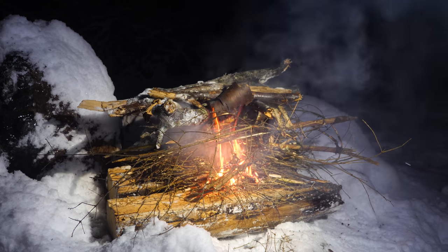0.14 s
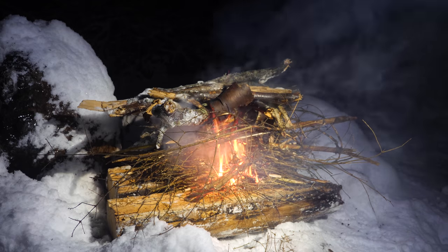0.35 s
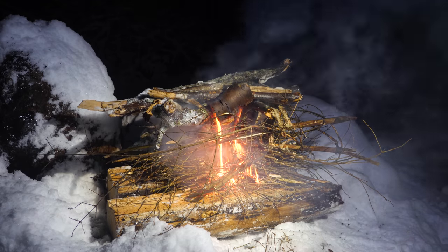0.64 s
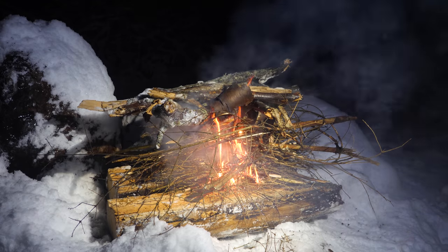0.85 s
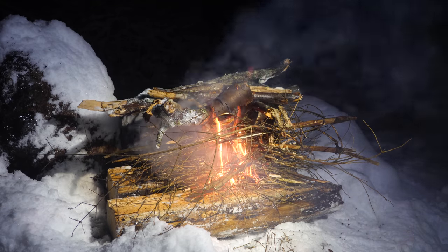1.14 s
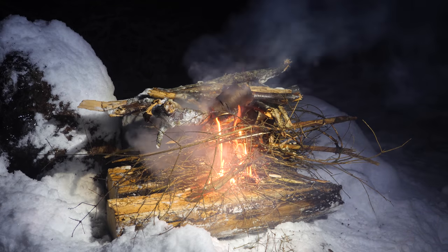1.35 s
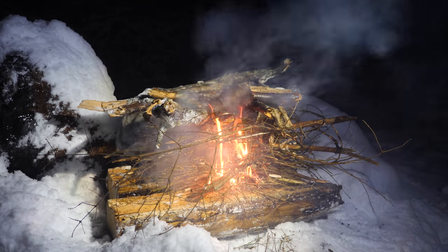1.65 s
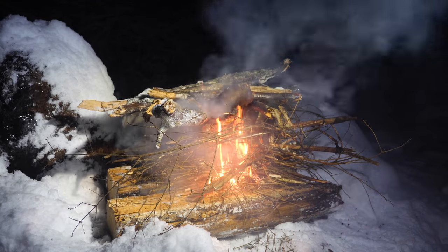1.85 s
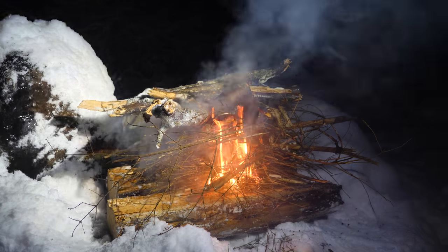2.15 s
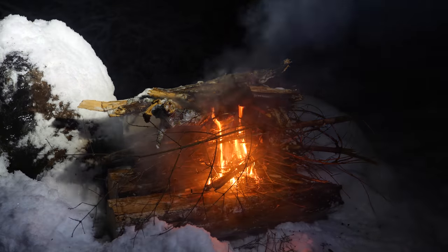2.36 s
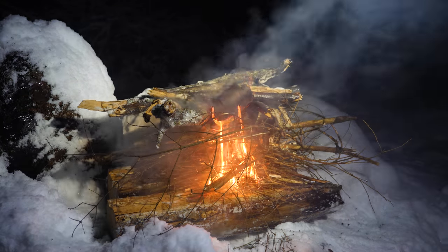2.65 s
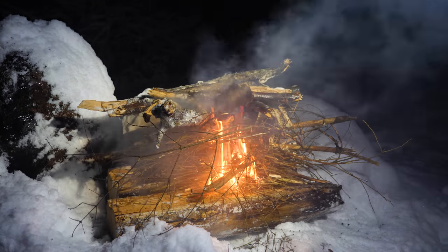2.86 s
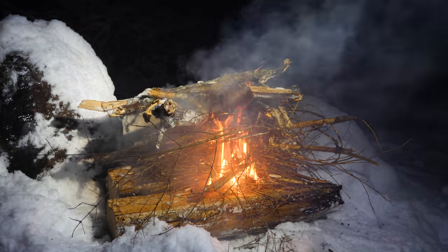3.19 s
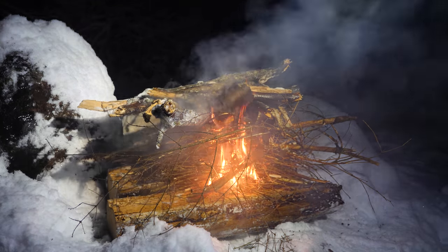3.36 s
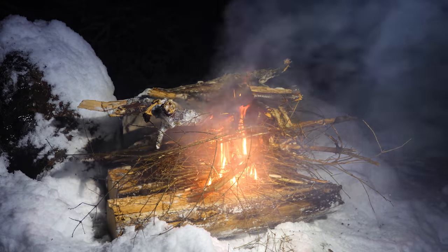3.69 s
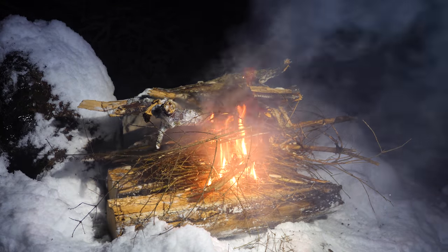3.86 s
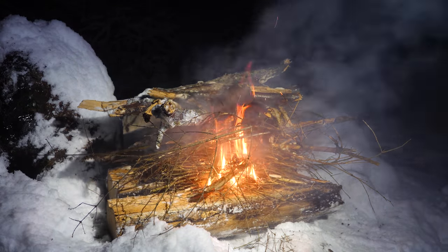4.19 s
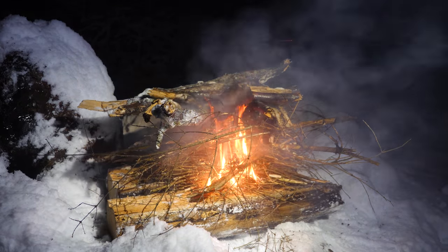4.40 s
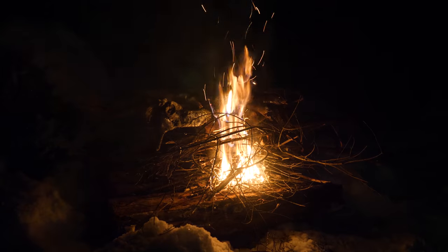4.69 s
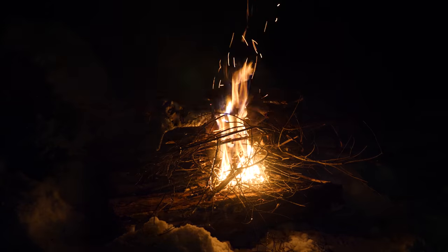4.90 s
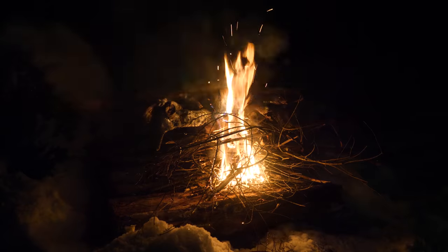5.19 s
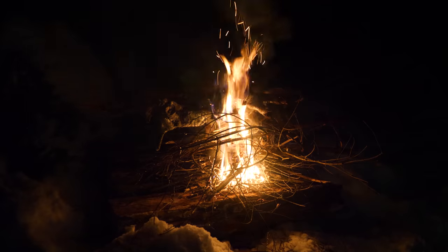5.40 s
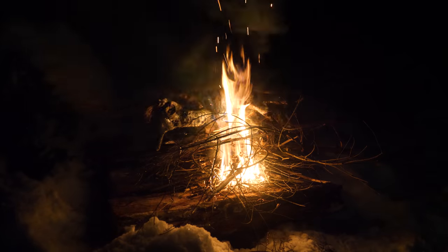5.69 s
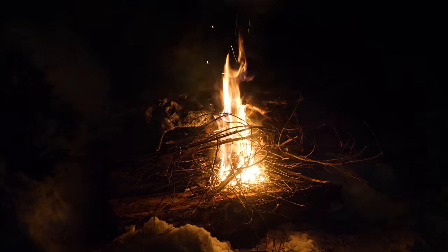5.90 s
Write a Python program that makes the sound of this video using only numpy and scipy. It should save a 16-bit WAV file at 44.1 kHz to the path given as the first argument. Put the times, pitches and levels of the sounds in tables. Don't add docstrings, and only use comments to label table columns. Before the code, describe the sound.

Twigs and wet logs crackle and fizz, scattered snaps building to hard, loud pops and a soft low fire flutter, heard close outdoors.

```python
import sys
import numpy as np
from scipy import signal
from scipy.fft import rfft, irfft
from scipy.io import wavfile
from scipy.ndimage import uniform_filter1d, minimum_filter1d, map_coordinates

SR = 44100
rng = np.random.default_rng(int(sys.argv[2]) if len(sys.argv) > 2 else 0)


def materialize(psi):
    bounded = np.clip(np.atleast_2d(psi).T, -1, 1)
    quanta = np.round(bounded * 32767).astype(np.int16)
    wavfile.write(sys.argv[1], SR, quanta)


def attenuation_scalar(level_db):
    decades = np.asarray(level_db, float) / 20
    return 10 ** decades


N = 266364
LIFE = 1024


def unit(x):
    return x / np.sqrt(np.mean(x ** 2) + 1e-20)


def along(points, hz):
    f, v = np.transpose(points)
    return np.interp(np.log(hz + 1), np.log(f + 1), v)


def wobble(rate):
    knots = rng.standard_normal(int(N * rate / SR) + 4)
    return map_coordinates(knots, [np.arange(N) * rate / SR])


def rush(spectrum, patchy_db):
    hz, _, z = signal.stft(rng.standard_normal(N), SR, nperseg=1024)
    field = uniform_filter1d(rng.standard_normal(z.shape), 8, 0)
    field = uniform_filter1d(field, 5, 1)
    gain = attenuation_scalar(along(spectrum, hz)[:, None] + patchy_db * unit(field))
    return unit(signal.istft(z * gain, SR, nperseg=1024)[1][:N])


def flames(flame_db):
    # f/Hz, level/dB per Hz
    flame_tone = [(18, -12), (65, 3), (120, -1.5), (220, -8.5), (400, -8.5), (600, -22.5), (1200, -120)]
    flutter_db = 0.34 + 0.045 * np.clip(flame_db + 68.0, 0, 9)
    return attenuation_scalar(flame_db + flutter_db * wobble(14)) * rush(flame_tone, patchy_db=0.8)


def roar(roar_db, flare):
    # f/Hz, level/dB per Hz
    roar_tone = [(150, -9), (250, -14.5), (496, -6.5), (775, -1), (1100, -8), (1400, -14), (1820, -13.5),
                 (3080, -120)]
    return attenuation_scalar(roar_db + 0.37 * flare) * rush(roar_tone, patchy_db=1.1)


def steam(steam_db, flare):
    # f/Hz, level/dB per Hz
    steam_tone = [(900, -35), (1250, 12), (3350, 10), (5000, -2), (5900, -7), (7000, -46), (9000, -120)]
    return attenuation_scalar(steam_db - 2.0 + 1.4 * flare) * rush(steam_tone, patchy_db=-1.5)


def steam_pressure(clock):
    # t/s, level/dB
    jets = [(0, -62), (.3, -67.5), (.95, -67.5), (1.45, -60), (1.7, -66.5), (2, -62), (2.38, -63),
            (2.65, -60.5), (3.05, -62.5), (3.4, -63), (4.3, -63), (5.1, -65), (5.32, -59.5), (6.04, -60.5)]
    # t/s, level/dB
    vents = [
        (3.946, -46.5),
        (4.574, -48),
        (4.8, -48.5),
    ]
    fall = 134
    power = attenuation_scalar(2 * np.interp(clock, *np.transpose(jets)))
    for s, db in vents:
        power = power + (clock > s) * attenuation_scalar(2 * (db - fall * np.abs(clock - s)))
    return 10 * np.log10(power)


def fizz(fizz_db, fibres):
    # f/Hz, level/dB per Hz
    fizz_tone = [(5000, -2), (5800, -9), (7100, -8), (10700, -9.5), (15000, -12.5), (15700, -36),
                 (15950, -120)]
    jolt = np.diff(fibres, prepend=0) ** 2
    wide_swell = np.sqrt(np.abs(uniform_filter1d(jolt, 700)))
    close_swell = np.sqrt(np.abs(uniform_filter1d(jolt, 220)))
    seep = attenuation_scalar(fizz_db + 1.1 + 3.3 * wobble(40) + 1.2 * wobble(160))
    return (seep + 0.13 * wide_swell + 0.14 * close_swell) * rush(fizz_tone, patchy_db=2.8)


def causal(db):
    fold = np.r_[1, np.full(LIFE // 2 - 1, 2.), 1, np.zeros(LIFE // 2 - 1)]
    return np.exp(rfft(irfft(np.log(attenuation_scalar(db)), LIFE) * fold))


def bursts(s, peak_db, hollow_hz, thud_db, snap_db, echo_db, t60):
    # f/Hz, level/dB
    burst_tone = [(120, -25), (320, -3), (900, 0.5), (2400, 1), (4800, -4), (6500, -8), (10500, -15.5),
                  (15200, -16), (16300, -41), (16800, -92)]
    count = len(s)
    t, hz = np.arange(LIFE) / SR, np.fft.rfftfreq(LIFE, 1 / SR)

    late = t > .0002
    scatter = attenuation_scalar(echo_db - 60 * t / t60)
    snow_tail = attenuation_scalar(echo_db - 23.5 - 60 * t / 0.15)
    echoes = rfft(late * (scatter + snow_tail) * rng.standard_normal((count, LIFE)))
    hollow = causal(6.9 / (1 + ((hz - hollow_hz[:, None]) / 450) ** 2) - 0.64 * hz / 10000)
    thin = hz ** 2 / (hz ** 2 + 1900 ** 2)

    low = 1 / (1 + (hz / 1200) ** 4)
    high = 1 / (1 + (6000 / (hz + 1)) ** 8)
    glint_db = 7 * rng.standard_normal((count, 1))
    glint_hz = rng.uniform(5660, 13600, (count, 1))
    glint = glint_db / (1 + ((hz - glint_hz) / 1500) ** 2)
    balance = np.outer(thud_db + 11.5, low) + np.outer(snap_db + 10.5, high)
    colour = causal(along(burst_tone, hz) + glint + balance)

    swing = np.clip(.45 - 0.014 * thud_db, .1, .92)[:, None]
    rebound = swing * np.exp(-2j * np.pi * hz * 0.00015)
    spectrum = (echoes * hollow * thin + rebound - 1) * colour
    crest = np.abs(irfft(spectrum * (hz > 1200), LIFE)).max(1)
    wave = irfft(spectrum, LIFE) * (attenuation_scalar(peak_db) / crest)[:, None]
    at = np.round(s * SR).astype(int)[:, None] + np.arange(LIFE)
    return np.bincount(at.ravel(), wave.ravel(), N + LIFE)[:N]


def ticks(s, peak_db, snap_db, echo_db):
    draw = rng.standard_normal((len(s), 2))
    hollow_hz = 3000 * np.exp(0.56 * draw[:, 0])
    thud_db = -16 + 3.0 * draw[:, 1]
    return bursts(s, peak_db, hollow_hz, thud_db, snap_db, echo_db, t60=0.0092)


def crackle(fizz_db, count=650):
    s, size, snap = rng.random((count, 3)).T
    s = s * (N - 1) / SR
    at = (s * SR).astype(int)
    peak_db = .5 * fizz_db[at] - 15 + 5 * size ** 2 + 3.8 * wobble(18)[at]
    return ticks(s, peak_db, -12 + 16 * snap, echo_db=-11.5)


def splits():
    # t/s, level/dB (peak)
    damp = [(.0274, -29), (.1019, -27.5), (.3086, -31), (0.9455, -30), (1.0774, -26), (1.3385, -26),
            (1.8212, -27), (2.0647, -27), (2.075, -31), (2.5595, -29.5), (2.8597, -28), (2.87, -31),
            (3.329, -26), (3.4839, -27), (3.8912, -26), (4.0378, -31), (4.045, -31), (4.3169, -26),
            (4.659, -31), (4.903, -24), (4.931, -29), (5.3133, -26.5), (5.415, -29), (5.4352, -26.5),
            (5.492, -24.5), (5.5985, -29), (5.6875, -23), (5.7418, -29), (5.871, -27), (5.894, -33)]
    # t/s, level/dB (peak)
    seasoned = [(.109, -28), (.24, -32.5), (0.3556, -21.5), (0.963, -28), (1.456, -29), (1.7284, -30.5),
                (1.758, -29.5), (1.8081, -27), (1.827, -24), (1.8626, -30), (2.7376, -25), (2.7471, -28.5),
                (2.9968, -31), (3.1075, -29), (3.166, -28), (3.2732, -29.5), (3.588, -27), (3.6852, -27.5),
                (3.8988, -30), (4.144, -31), (4.2948, -25.5), (4.6702, -24), (4.8355, -25.5), (5.0622, -27),
                (5.2913, -32), (5.3896, -22), (5.526, -26), (5.559, -26), (5.78, -28), (5.9592, -30)]
    # t/s, level/dB (peak)
    brittle = [(0.7733, -27), (0.778, -26), (.856, -27), (0.865, -27), (.8978, -28.5), (.983, -29.5),
               (1.4775, -29), (1.6009, -26), (1.671, -25), (1.8413, -25), (2.117, -28), (2.1709, -27.5),
               (2.5545, -25.5), (2.9001, -28), (2.9175, -30), (2.9507, -29.5), (3.258, -33),
               (3.3003, -23.5), (3.3184, -29), (3.7552, -26), (3.874, -27.5), (4.5308, -28), (4.8215, -30),
               (4.9985, -27.5), (5.0222, -28.5), (5.088, -27), (5.0974, -27), (5.1624, -23.5),
               (5.8086, -25), (5.995, -29)]
    # t/s, level/dB (peak)
    lone = [(.164, -33), (.3657, -43), (.3948, -33), (.4517, -33), (.5897, -46), (.841, -33), (1.0317, -40),
            (1.0568, -28), (1.14, -33), (1.1665, -33.5), (1.1859, -34), (1.2097, -33), (1.2769, -31.5),
            (1.5383, -31), (1.57, -27), (1.717, -34), (1.7746, -30), (1.9225, -34), (2.1946, -31),
            (2.2986, -31), (2.6011, -31), (2.7203, -30), (2.7568, -31), (3.5155, -29), (3.8116, -30.5),
            (4.5663, -28), (4.602, -37), (5.0509, -34), (5.3811, -39), (5.777, -21)]
    # t/s, level/dB (peak)
    faint_damp = [(0.017, -39), (0.1933, -34.5), (0.2516, -41), (0.4314, -40), (0.465, -38),
                  (0.4966, -30.5), (0.59, -37), (0.719, -40), (0.8843, -29.5), (0.9356, -37), (1.049, -40),
                  (1.0913, -30), (1.2204, -40), (1.2258, -39), (1.3085, -35), (1.3594, -39), (1.428, -37),
                  (1.489, -42), (1.6206, -38), (1.7682, -38), (1.7834, -35), (1.8148, -33), (1.8946, -30.5),
                  (1.9499, -42), (1.96, -34), (2.0016, -36), (2.254, -33), (2.5796, -31), (2.87, -32),
                  (2.9926, -31), (3.013, -37), (3.017, -35), (3.0254, -40), (3.0657, -37), (3.2445, -39),
                  (3.4606, -42), (3.963, -33), (4.0143, -39), (4.3947, -36), (4.4236, -37), (4.4372, -28),
                  (4.6024, -36), (4.8781, -36), (4.9347, -37), (5.0099, -43), (5.402, -41), (5.5219, -37),
                  (5.5846, -36), (5.6488, -32), (5.6761, -40), (5.6917, -39), (5.7148, -18), (5.7242, -27),
                  (5.825, -31), (5.8949, -27)]
    # t/s, level/dB (peak)
    faint_seasoned = [(0.0226, -40), (0.0492, -42), (0.0853, -31.5), (0.2322, -41), (0.309, -33),
                      (0.5142, -30.5), (0.5375, -34), (0.6264, -43), (0.9263, -43), (1.0013, -32.5),
                      (1.1514, -38), (1.1938, -46), (1.353, -41), (1.4331, -35), (1.4623, -30),
                      (1.5912, -33), (1.7363, -42), (2.0146, -35), (2.1259, -40), (2.1657, -33),
                      (2.4577, -36), (2.5733, -39), (2.658, -36), (2.679, -32.5), (2.782, -44),
                      (2.8556, -25), (2.9216, -37), (2.957, -28.5), (3.0894, -27), (3.123, -32),
                      (3.2554, -44), (3.2625, -43), (3.545, -29), (3.606, -26), (3.6805, -40),
                      (3.7124, -37), (3.9724, -33), (3.989, -32), (4.0446, -34), (4.0569, -40),
                      (4.0872, -33), (4.3786, -32), (4.4326, -35), (4.441, -36), (4.5044, -34),
                      (4.6293, -32), (4.716, -35), (4.8215, -29), (4.8663, -39), (4.9941, -35),
                      (5.0776, -36), (5.2049, -30.5), (5.4983, -32), (5.556, -33), (5.962, -26.5)]
    # t/s, level/dB (peak)
    faint_brittle = [(0.0727, -32), (0.1381, -39), (0.3656, -39), (0.528, -36), (0.5535, -32.5),
                     (0.6009, -42), (0.668, -32.5), (0.6835, -37), (0.6988, -46), (0.7443, -33),
                     (0.8913, -32), (0.9397, -33.5), (0.9516, -34), (0.9575, -27), (0.9785, -35),
                     (1.004, -33), (1.0826, -41), (1.4706, -31), (1.6668, -27), (2.3213, -36),
                     (2.3312, -38), (2.3673, -33), (2.3887, -33), (2.404, -32), (2.4187, -30),
                     (2.4229, -31), (2.5093, -38), (2.5263, -41), (2.7634, -31), (2.9044, -35),
                     (2.915, -34), (3.3867, -32), (3.3927, -33), (3.4077, -31), (3.426, -32.5),
                     (3.4765, -35), (3.4885, -26), (3.6488, -35), (3.907, -33), (3.9234, -29),
                     (4.0214, -34), (4.1262, -43), (4.3303, -40), (4.4624, -42), (4.5334, -38),
                     (4.581, -32), (4.714, -32), (4.8534, -37), (5.0035, -33), (5.2892, -34), (5.2939, -35),
                     (5.381, -28), (5.6091, -36), (5.6126, -37), (5.9914, -40)]
    # t/s, level/dB (peak)
    fine_seasoned = [(0.0492, -43), (0.1197, -38), (0.1954, -43), (0.2237, -43), (0.511, -38),
                     (0.8415, -38), (0.8477, -44), (1.0483, -36), (1.064, -43), (1.1938, -43),
                     (1.2478, -45), (1.2522, -40), (1.3594, -39), (1.4341, -35), (1.5292, -41),
                     (1.5437, -39), (1.6373, -40), (1.7853, -36), (2.058, -36), (2.1259, -40), (2.412, -34),
                     (2.5593, -30.5), (2.7821, -42), (2.9151, -36), (2.9602, -34), (2.9756, -37),
                     (3.0693, -45), (3.089, -40), (3.1757, -37), (3.2316, -44), (3.2445, -42),
                     (3.2554, -40), (3.2625, -40), (3.59, -28), (3.5996, -31), (3.6145, -31), (3.699, -42),
                     (4.116, -43), (4.1312, -38), (4.4095, -43), (4.4411, -35), (4.6338, -37),
                     (4.6653, -37), (4.7096, -36), (4.76, -42), (4.8781, -36), (4.9749, -32), (5.0771, -33),
                     (5.1046, -34), (5.2711, -37), (5.3082, -37), (5.402, -40), (5.4084, -37),
                     (5.4526, -39), (5.5213, -37), (5.5686, -27), (5.7962, -33), (5.9412, -41)]
    # t/s, level/dB (peak)
    fine_brittle = [(0.174, -47), (0.3027, -45), (0.3344, -43), (0.3656, -37), (0.5025, -34), (0.6357, -39),
                    (0.7257, -39), (0.8623, -37), (0.9516, -36), (0.968, -36), (1.0133, -40), (1.0826, -41),
                    (1.1637, -42), (1.3488, -40), (1.5118, -41), (1.5804, -47), (1.6977, -42),
                    (1.9333, -41), (2.0876, -43), (2.1417, -43), (2.4065, -38), (2.4689, -42),
                    (2.9044, -31.5), (3.0155, -39), (3.0767, -42), (3.08, -46), (3.2483, -43),
                    (3.2939, -41), (3.421, -33), (3.5645, -33), (3.6909, -36), (3.7086, -37), (3.8266, -45),
                    (3.9904, -35), (4.0005, -41), (4.0041, -40), (4.2617, -46), (4.3839, -42),
                    (4.4624, -39), (4.5017, -39), (4.5189, -42), (4.5572, -30), (4.581, -30), (4.6834, -42),
                    (4.7754, -36), (4.9702, -41), (5.0039, -34), (5.0205, -35), (5.1832, -41),
                    (5.2113, -37), (5.2281, -32), (5.3368, -40), (5.3849, -43), (5.5083, -45),
                    (5.7885, -37), (5.8136, -34), (5.8456, -35), (5.9902, -32)]
    kinds = (
        (damp, -11.5), (seasoned, -6), (brittle, -2.7), (lone, -9.5),
        (faint_damp, -21), (faint_seasoned, -8), (faint_brittle, -3.5),
        (fine_seasoned, -11), (fine_brittle, -1.5))
    rows = [(s, db, snap_db) for table, snap_db in kinds for s, db in table]
    return ticks(*np.transpose(rows), echo_db=-13.5)


def pops():
    # t/s, level/dB (peak), f/Hz (hollow between sticks), snap level/dB
    twig_pops = [(.093, -25, 4910, -6), (1.3889, -21, 5440, -5), (1.4512, -18.5, 3400, -11),
                 (1.625, -24, 2540, 1), (2.0308, -22.5, 5400, -6.5), (2.1095, -18.5, 4970, -6),
                 (2.238, -18, 3140, -7), (2.4762, -24.5, 3080, -9), (2.5902, -17, 2420, -6.5),
                 (2.7996, -20.5, 2890, -2), (2.9044, -36, 2890, -7), (3.1399, -22, 2970, -8),
                 (3.1514, -23, 2910, -8), (3.3403, -18, 3250, -6), (3.4124, -25.5, 5450, 6),
                 (3.6274, -22, 4950, -4), (3.76, -20, 2540, -2), (4.1471, -23, 2070, -18),
                 (4.3506, -18.5, 2860, -8), (4.3678, -21.5, 5130, 2), (4.5502, -25, 5120, -5),
                 (4.7461, -19.5, 3320, -10), (5.469, -22, 4630, -11), (5.8501, -16, 2950, 0),
                 (6.0132, -20.5, 4930, -3.5)]
    # t/s, level/dB (peak), f/Hz (hollow), snap level/dB
    bark_pops = [(.3176, -18, 1680, -11), (.7468, -19, 2500, -13), (1.1013, -21, 1640, -18),
                 (1.3305, -16.5, 4930, 0.5), (2.2656, -22.5, 3400, -5), (2.3132, -20.5, 2230, -9),
                 (2.5795, -33, 2430, -21), (2.8364, -21, 3120, -33), (3.7824, -21, 1700, -6),
                 (3.8482, -20.5, 5360, 2), (3.911, -23.5, 2580, 4), (4.1721, -19, 2710, -9.5),
                 (4.453, -20.5, 1960, -11), (4.4939, -21, 1490, -4), (4.581, -29, 2220, 12),
                 (4.6395, -25, 2630, -24), (4.7314, -18.5, 2410, -5), (4.9197, -24, 3380, -4),
                 (4.9747, -25.5, 2390, -19), (5.0835, -19.5, 3180, -26), (5.259, -23.5, 2240, -17),
                 (5.341, -19, 2130, 0), (5.4439, -23, 3570, 1), (5.5657, -21.5, 2710, -13),
                 (5.8296, -20.5, 2580, -1)]
    # t/s, level/dB (peak), f/Hz (hollow), thud level/dB, snap level/dB
    log_pops = [(.4623, -11.5, 2130, -2.5, -3.5), (1.8399, -13.5, 4950, -6.5, 2),
                (2.4795, -11, 3260, -17, -13.5), (2.7074, -13, 2500, -12, -5), (2.858, -11, 2340, -7, -9),
                (3.0973, -10, 4740, -13.5, -10), (3.4914, -10.5, 4700, -21, -0.5),
                (3.537, -9, 1520, -4, -21), (3.9455, -6, 1400, -6, -5), (4.1501, -10.5, 2710, -12, -2),
                (4.2352, -14, 1750, -7, -12.5), (4.4823, -15.5, 2110, -10, -14), (4.5723, -2, 1350, -2, -3),
                (4.7938, -4.5, 2130, -3.5, -5.5), (4.8123, -11, 3170, -13, -36),
                (4.8984, -7, 1370, 1, -10.5), (4.9143, -15, 1460, 4, -10), (4.9152, -19, 2400, -3, -8),
                (5.2486, -11.5, 3370, -11.5, -9.5), (5.392, -4.5, 3370, -10.5, -21.5),
                (5.5419, -7, 3270, -6, -22.5), (5.7137, -18.5, 3200, -6, -26), (5.718, -15, 4840, -12, -28),
                (5.8793, -13.5, 3180, -20, -11), (5.9106, -18, 3180, -27, -10)]
    rows = [*log_pops]
    for table, thud_db in ((bark_pops, -5), (twig_pops, -33)):
        rows += [(s, db, hz, thud_db, snap_db) for s, db, hz, snap_db in table]
    return bursts(*np.transpose(rows), echo_db=-20.0, t60=0.013)


def knocks():
    # t/s, level/dB (peak), f/Hz, t60/s
    log_knocks = [
        (2.072, -33, 620, 0.011),
        (2.366, -33.5, 420, 0.016),
        (3.5367, -21.5, 454, 0.02),
        (3.5359, -30.5, 173, 0.02),
        (3.5368, -28, 620, 0.0084),
        (3.8762, -28, 805, 0.022),
        (4.2092, -27, 477, 0.013),
        (4.794, -21.5, 442, 0.022),
    ]
    # t/s, level/dB (peak), f/Hz, t60/s
    stick_rings = [
        (2.4795, -27, 3240, 0.0052),
        (3.0973, -24, 3750, 0.0073),
        (4.7938, -25, 940, .01),
        (4.8123, -27, 3160, 0.014),
        (5.392, -26, 3290, 0.01),
        (5.5419, -12.5, 3220, 0.0083),
        (5.718, -21.5, 4760, 0.0086),
        (5.8793, -16.5, 3140, .006),
        (5.9106, -22, 3140, 0.0085),
    ]
    wood, t = np.zeros(N), np.arange(LIFE) / SR
    for table, wait in ((log_knocks, 0), (stick_rings, .5)):
        for s, db, hz, t60 in table:
            ring = attenuation_scalar(db - 60 * t / t60) * np.sin(2 * np.pi * hz * t)
            wood[round(s * SR):][:LIFE] -= (hz * t >= wait) * ring
    return wood


def scene():
    # t/s, flame level/dB, roar level/dB, steam level/dB
    fire = [
        (0, -53.5, -50, -54.5),
        (4.55, -53, -50, -54),
        (4.95, -46, -47, -50.5),
        (6.04, -48.5, -48.5, -50.5),
    ]
    clock = np.arange(N) / SR
    s, *cols = np.transpose(fire)
    flame_db, roar_db, steam_db = (np.interp(clock, s, c) for c in cols)
    fizz_db = steam_pressure(clock)
    flare = wobble(7.6)
    fibres = splits()
    bed = flames(flame_db) + roar(roar_db, flare) + steam(steam_db, flare) + fizz(fizz_db, fibres)
    mid = bed + crackle(fizz_db) + fibres + pops() + knocks()
    return np.array([mid, mid])


def masked(dry, depth_db=-21, top_db=-62):
    hz, _, z = signal.stft(dry, SR, nperseg=256)
    size = uniform_filter1d(np.abs(z), size=3, axis=1)
    around = uniform_filter1d(size, size=15, axis=1)
    nearby = -minimum_filter1d(-around, size=11, axis=2)
    spared = uniform_filter1d(rng.standard_normal(z.shape[1:]), size=5, axis=0) > 0
    kept = (size > attenuation_scalar(depth_db) * nearby) | spared | (hz < 5500)[:, None]
    kept &= (nearby > attenuation_scalar(top_db)) | (hz < 15900)[:, None]
    return signal.istft(z * kept, SR, nperseg=256)[1][:, :N]


def stereo_grain(mid):
    # f/Hz, side-to-mid level/dB
    side_tone = [(60, -20), (400, -21), (2500, -22), (5000, -18), (15000, -13)]
    hz, t, z = signal.stft(mid, SR, nperseg=1024)
    size = uniform_filter1d(np.abs(z), 9, 0)
    noise = signal.stft(rng.standard_normal(N), SR, nperseg=1024)[2]
    edges = [350, 700, 1000, 1400, 1900, 2600, 3400, 4200, 5700, 7000, 9600, 12000, 14000, 15900]
    bands = np.searchsorted(edges, hz)
    pairs = len(t) // 2 + 1
    luck = rng.standard_normal((15, pairs)) + 1.2 * rng.standard_normal(pairs)
    rarity = np.where(hz < 4200, .75, -.6)[:, None]
    kept = luck[bands].repeat(2, 1)[:, :len(t)] > rarity
    grain = unit(np.abs(noise)) * np.exp(1j * np.angle(noise)) * size * kept
    return signal.istft(grain * attenuation_scalar(along(side_tone, hz))[:, None], SR, nperseg=1024)[1][:N]


def top_cut(x):
    return signal.sosfilt(signal.butter(12, 16820, fs=SR, output="sos"), x)


def record(dry):
    dry = masked(dry)
    side = stereo_grain(dry[0])
    return top_cut(dry + [side, -side])


dry = scene()
out = record(dry)
materialize(out)
```